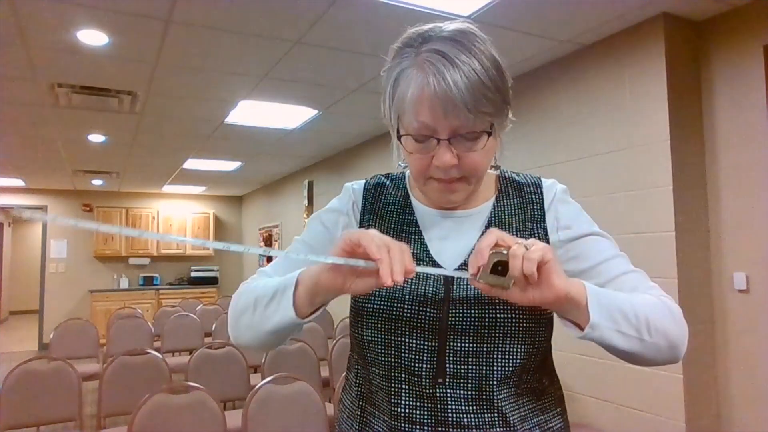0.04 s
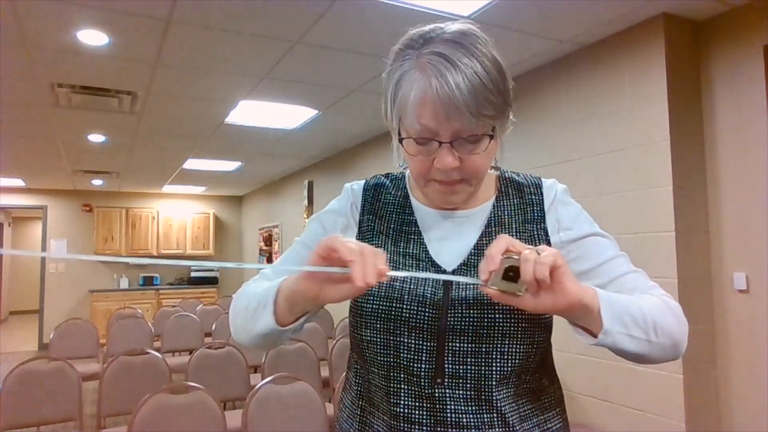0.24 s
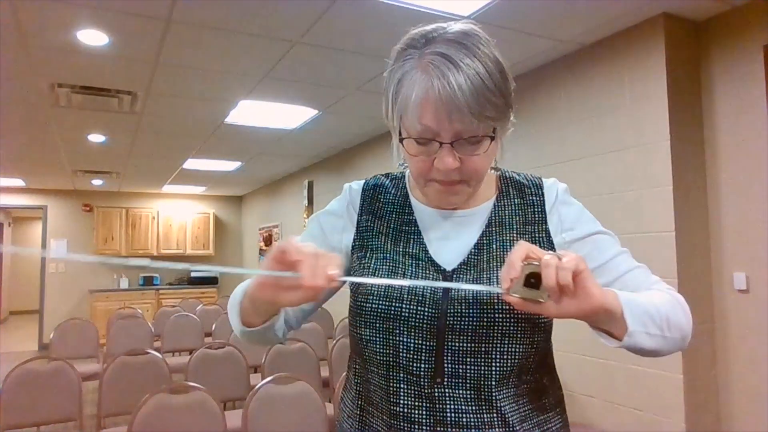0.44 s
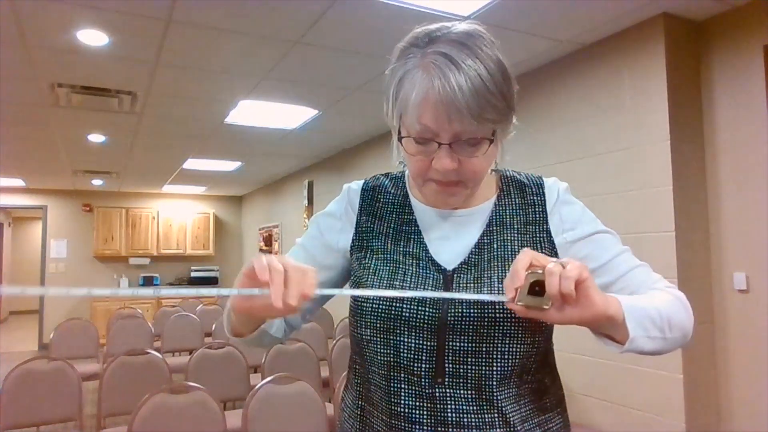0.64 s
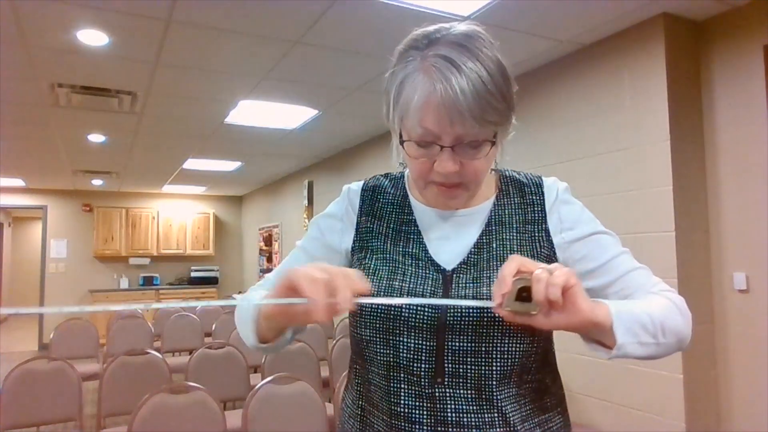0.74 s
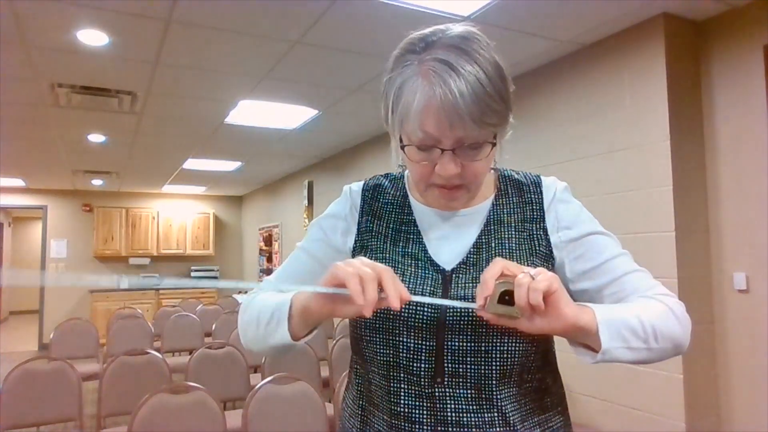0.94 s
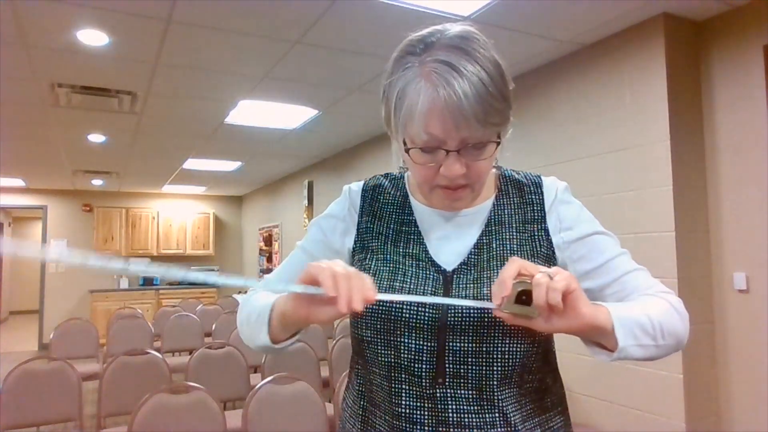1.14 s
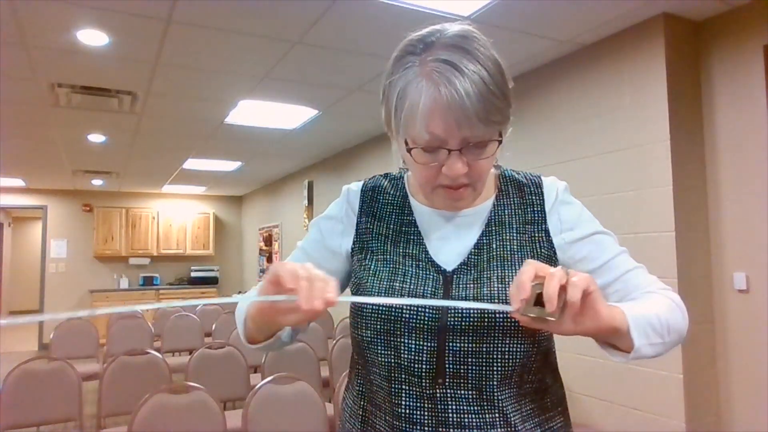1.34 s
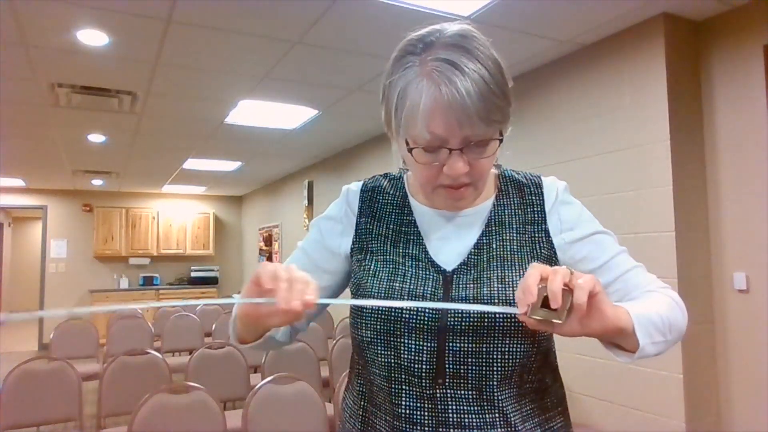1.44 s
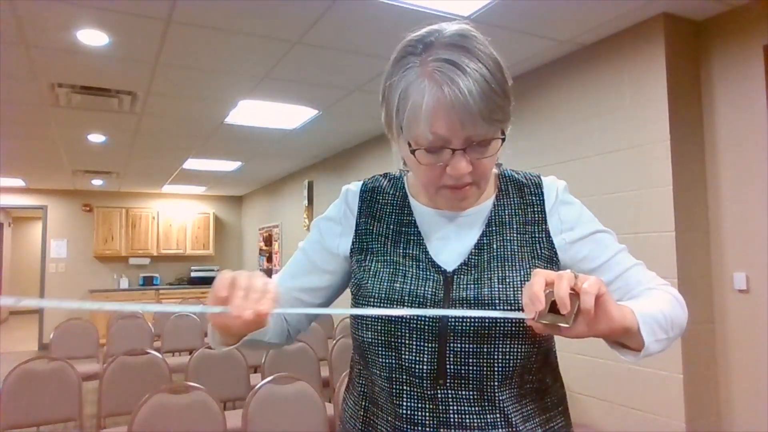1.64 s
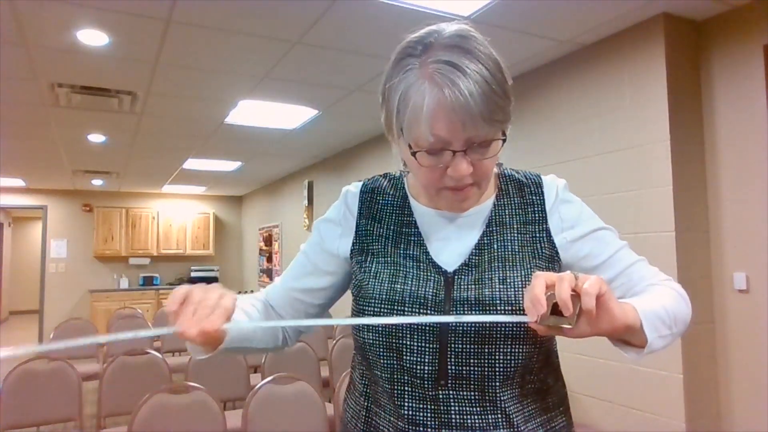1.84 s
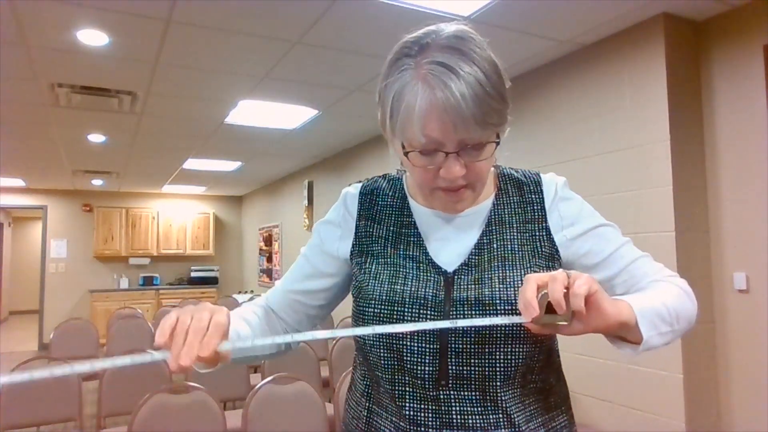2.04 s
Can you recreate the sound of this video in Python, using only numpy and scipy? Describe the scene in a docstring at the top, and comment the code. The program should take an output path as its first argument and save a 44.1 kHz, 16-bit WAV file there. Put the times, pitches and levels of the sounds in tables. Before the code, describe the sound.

Metal tape measure blade rasps out of its case, clatters to a stop, then is drawn again

```python
"""A large, well damped room: a steel tape measure is drawn from its case in two pulls, close by.
Slips of the curved blade in the slot make coloured noise; catches and the clattering stop ring resonances.
Between the pulls a hand slides back along the blade, heard as fluttering high noise.
Underneath are a low electrical throb of filtered pulses, thin wavering sines and a little hiss."""
import sys
import numpy as np
from scipy import signal
from scipy.fft import rfft, irfft, next_fast_len
from scipy.io import wavfile

SR = 44100
rng = np.random.default_rng(int(sys.argv[2]) if len(sys.argv) > 2 else 0)


def int16_out(signal):
    """Quantize to a 16-bit WAV file."""
    q = np.round(np.clip(np.atleast_2d(signal).T, -1, 1) * 32767)
    wavfile.write(sys.argv[1], SR, q.astype(np.int16))


N = 91595
TIME_S = np.arange(N) / SR
TREBLE_CORNER_HZ = 7900

# blade and case colour at take-up and regrip: (frequency [Hz], relative level [dB])
TAKE_UP_COLOUR = [(350, -54.5), (600, -17), (747, -18.5), (1080, -15.5), (1380, -36.5), (1820, -16.5),
                  (2270, -14), (2600, -1), (2940, -4), (3420, 5), (4200, -6), (4750, 0), (5920, -5.5),
                  (6600, -2.5), (7270, -8), (7780, -11.5), (10800, -11.5), (12100, -10), (15900, -11)]


def from_db(db):
    """Decibels to amplitude gain."""
    return 10 ** (np.asarray(db) / 20)


def rms_one(x):
    """Scale to unit power."""
    return x / np.sqrt(np.mean(x ** 2) + 1e-20)


def drift(rate_hz):
    """Random wander of unit rms: noise through a double one-pole low-pass."""
    pole = np.exp(-2 * np.pi * rate_hz / SR)
    noise = rng.standard_normal(N + SR)
    settled = signal.lfilter([1], [1, -2 * pole, pole * pole], noise)[SR:]
    return rms_one(settled)


def envelope(curve, edge_s=0.003):
    """Gain along a (time [s], level [dB]) curve, with Gaussian fades beyond its ends."""
    time_s, level_db = np.transpose(curve)
    outside_s = np.maximum(np.maximum(time_s[0] - TIME_S, TIME_S - time_s[-1]), 0)
    return from_db(np.interp(TIME_S, time_s, level_db)) * np.exp(-(outside_s / edge_s) ** 2)


def coloured(x, spectrum, size=4096):
    """Minimum-phase filter along a (frequency [Hz], level [dB]) spectrum; unit power."""
    hz, db = np.transpose(spectrum)
    grid_hz = np.maximum(np.arange(size // 2 + 1) * SR / size, 1)
    low_rolloff = np.minimum(grid_hz / hz[0], 1) ** 2
    magnitude = low_rolloff * from_db(np.interp(np.log(grid_hz), np.log(hz), db))
    # fold the cepstrum onto positive time to make the filter causal
    cepstrum = irfft(np.log(magnitude))
    cepstrum[1:size // 2] *= 2
    cepstrum[size // 2 + 1:] = 0
    response = irfft(np.exp(rfft(cepstrum)))
    return rms_one(signal.fftconvolve(x, response)[:N])


def resonate(x, modes):
    """Parallel resonances (frequency [Hz], width [Hz], level [dB]) with alternating signs."""
    out = 0
    for k, (hz, width_hz, db) in enumerate(modes):
        r = np.exp(-np.pi * width_hz / SR)
        gain = (-1) ** k * from_db(db) * (1 - r * r) / 2
        poles = [1, -2 * r * np.cos(2 * np.pi * hz / SR), r * r]
        out = out + gain * signal.lfilter([1, 0, -1], poles, x + 1e-18)
    return out


def rubbed(force, modes):
    """Resonances driven by a rough contact; a steady force of 1 gives unit power."""
    noise = rng.choice([-1., 1.], N)
    return resonate(noise * force, modes) / np.std(resonate(noise, modes))


def burst(start_s, length_s):
    """Contact force that sets in at once and dies away as a half Gaussian."""
    return (TIME_S >= start_s) * np.exp(-((TIME_S - start_s) / length_s) ** 2)


def tail(x, t60_s):
    """Dense ring: convolution with exponentially decaying noise of unit energy."""
    response = rng.standard_normal(N) * from_db(-60 * TIME_S / t60_s)
    return signal.fftconvolve(x, response / np.sqrt(np.sum(response ** 2)))[:N]


def rough_noise(rough_db, rate_hz):
    """Noise whose strength flutters."""
    return rng.standard_normal(N) * from_db(rough_db * drift(rate_hz))


def high_pass(x):
    """First-order treble split."""
    return signal.sosfilt(signal.butter(1, TREBLE_CORNER_HZ, "high", fs=SR, output="sos"), x)


def scrape(curve, colour):
    """Tiny slips under fluttering contact pressure ring the blade; harder scraping is brighter."""
    slips_per_s, slip_spread_db = 7000, 2.5
    chatter_hz, chatter_db = 78, 1
    steel_t60_s, steel_db = 0.11, -7
    brightening = 0.23  # extra treble dB per dB of scraping

    size_db = slip_spread_db * np.minimum(rng.exponential(1, N), 4)
    sizes = from_db(size_db) * rng.choice([-1, 1], N)
    happens = rng.random(N) < slips_per_s / SR
    slips = sizes * happens * from_db(chatter_db * drift(chatter_hz))
    sound = coloured(slips + from_db(steel_db) * tail(slips, steel_t60_s), colour)

    gain = envelope(curve)
    effort = gain / np.sqrt(np.sum(gain ** 4) / np.sum(gain ** 2))
    treble_gain = (effort + 1e-9) ** brightening
    return gain * (sound + high_pass(sound) * (treble_gain - 1))


def blade():
    """First pull and clattering stop, then take-up and long pull; colour varies with grip and free length."""
    # scraping in each phase, before its trim: (time [s], level [dB])
    first_curve = [(0.03, -72), (0.082, -60), (0.11, -60.5), (0.124, -50.5), (0.172, -46), (0.198, -46),
                   (0.252, -44), (0.32, -37.5), (0.384, -37.5), (0.39, -38), (0.424, -43.5), (0.518, -40.5),
                   (0.53, -45)]
    clatter_curve = [(.522, -41), (.531, -34), (.535, -30), (.55, -28), (.561, -29.5), (.569, -31),
                     (.576, -31), (.586, -25.5), (.591, -33), (.603, -32.5), (.615, -45), (.627, -44),
                     (.64, -58), (.65, -54)]
    take_up_curve = [(1.03, -69), (1.065, -57), (1.085, -47), (1.105, -46.5), (1.12, -49), (1.125, -38),
                     (1.16, -38), (1.182, -45), (1.207, -42.5), (1.225, -46), (1.258, -46.5), (1.29, -39),
                     (1.305, -45)]
    long_curve = [(1.30, -45), (1.311, -31.5), (1.324, -32.5), (1.345, -31.5), (1.37, -33.5), (1.402, -33),
                  (1.412, -37), (1.45, -37), (1.47, -36), (1.52, -38.5), (1.58, -36), (1.63, -42),
                  (1.70, -39), (1.755, -48), (1.80, -42), (1.825, -36), (1.86, -35), (1.886, -38.5),
                  (1.91, -53), (1.94, -74)]
    # blade and case colour: (frequency [Hz], relative level [dB])
    first_colour = [(590, -62), (1000, -24), (1180, -23), (1350, -28.5), (1590, -17), (1960, -11.5),
                    (2120, -8.5), (2930, -3), (3220, -2), (3490, -4), (3830, -10.5), (4660, 2),
                    (6080, -11.5), (7140, -5.5), (8210, -14.5), (9880, -17), (11100, -12), (12600, -14.5),
                    (13800, -8.5), (15300, -20.5), (15900, -20.5)]
    clatter_colour = [(350, -92.5), (600, -27), (857, -24.5), (996, -20), (1370, -26), (1480, -28),
                      (2270, -13.5), (2500, -6), (2900, -8), (3370, -0.5), (3870, -14.5), (4620, -4),
                      (5380, -5.5), (6600, -1), (7270, -8.5), (9300, -5.5), (10800, -14.5), (11900, -7.5),
                      (15900, -18.5)]
    tug_colour = [(350, -76), (600, -35), (717, -18.5), (857, -25.5), (943, -39.5), (1020, -20.5),
                  (1520, -21.5), (1610, -25.5), (2390, -10), (2640, -7), (3420, 2.5), (5840, -10.5),
                  (6790, -0.5), (7680, -23), (9560, -3), (10500, -17), (11900, -14.5), (14800, -9),
                  (15900, -13)]
    glide_colour = [(350, -66), (600, -36), (857, -35), (1080, -10.5), (1400, -27), (1590, -11.5),
                    (2000, -22), (2600, 4.5), (2940, -2), (3370, -1), (3660, -5), (4200, 4.5), (4880, -15),
                    (5300, -3.5), (6080, -9), (6790, 1.5), (7680, -11.5), (8450, -13), (9430, -23),
                    (13600, -9.5), (15900, -17.5)]
    first_trim_db, clatter_trim_db, take_up_trim_db, long_trim_db = -1.0, -2.54, -0.96, -1.86
    tug_eases_s, easing_s = 1.414, 0.11  # centre and length of the crossfade

    # the hard tug gives way to an even glide
    eased = np.clip((TIME_S - tug_eases_s) / easing_s + 0.5, 0, 1)
    tug = np.sqrt(1 - eased) * scrape(long_curve, tug_colour)
    glide = np.sqrt(eased) * scrape(long_curve, glide_colour)

    first_pull = from_db(first_trim_db) * scrape(first_curve, first_colour)
    clatter = from_db(clatter_trim_db) * scrape(clatter_curve, clatter_colour)
    take_up = from_db(take_up_trim_db) * scrape(take_up_curve, TAKE_UP_COLOUR)
    return first_pull + clatter + take_up + from_db(long_trim_db) * (tug + glide)


def flexing(x, count=34):
    """As the blade flexes, narrow bands evenly spaced in root frequency swell and fade independently."""
    swell_db, swell_hz = 2.5, 19.5
    size = next_fast_len(N + 2048)
    spectrum = rfft(x, size)
    hz = np.arange(size // 2 + 1) * SR / size
    place = np.interp(np.sqrt(hz), np.sqrt([600, 16000]), [0, count - 1])
    out = 0
    for k in range(count):
        weight = np.maximum(1 - abs(place - k), 0)
        band = irfft(spectrum * weight, size)[:N]
        out = out + band * from_db(swell_db * drift(swell_hz))
    return out


def treble_shelf(x):
    """Raise or lower the treble of the scraping along a curve."""
    # treble gain: (time [s], level [dB])
    treble_curve = [(.08, -17), (.16, -1.5), (.24, -1.5), (.32, 3.5), (.42, 7), (.52, 8.5), (.6, -1),
                    (1.12, -4.5), (1.25, 8), (1.38, -0.5), (1.46, -3), (1.56, 2), (1.70, -2.5), (1.80, 5),
                    (1.89, -0.5)]
    gain = from_db(np.interp(TIME_S, *np.transpose(treble_curve)))
    return x + high_pass(x) * (gain - 1)


def brief_dips():
    """Gain that dips where the level briefly thins out."""
    # dips: (centre [s], half length [s], level [dB])
    dips = [(0.161, 0.015, -6.5), (0.393, 0.011, -4.5), (1.415, 0.0064, -3.5), (1.477, .013, -3),
            (1.592, 0.0078, -1), (1.717, 0.01, -5)]
    return from_db(sum(db * np.exp(-((TIME_S - s) / half_s) ** 4) for s, half_s, db in dips))


def rasp(rough_db=3.0, slips_hz=120):
    """On the long pull the blade's edge sticks and slips in the slot: one resonance under fluttering force."""
    # rasp force: (time [s], level [dB])
    rasp_curve = [(1.30, -59), (1.35, -40), (1.39, -43.5), (1.44, -54), (1.52, -49), (1.62, -51.5),
                  (1.72, -50), (1.78, -42), (1.83, -41), (1.885, -41.5), (1.905, -62)]
    force = envelope(rasp_curve) * from_db(rough_db * drift(slips_hz))
    return rubbed(force, [(6836, 154, 0)])  # (frequency [Hz], width [Hz], level [dB])


def catches():
    """The blade catches on the slot: short harsh contacts, each driving low, middle and high rings."""
    # contacts: (start [s], length [s], low ring [dB], middle ring [dB], high ring [dB])
    contacts = [(0.079, 0.015, -64, -66, -79), (.1235, 0.016, -53, -66, -64),
                (0.195, 0.0017, -40, -50, -63), (.2915, 0.002, -31, -38, -42),
                (0.319, 0.0025, -30, -35, -44), (0.386, 0.025, -40, -53, -36.5),
                (0.501, .003, -35, -42, -42), (0.534, 0.0056, -40, -34, -21), (.540, 0.0048, -41, -28, -25),
                (0.556, 0.0014, -34, -40, -28), (0.576, 0.0057, -39, -32, -26.5),
                (.584, 0.0028, -37, -27, -52), (0.622, 0.0032, -40, -45, -64),
                (0.657, 0.014, -54, -70, -76), (0.706, 0.0019, -55.5, -64.5, -59),
                (0.749, 0.0025, -57, -58.5, -62), (1.0815, 0.00087, -52, -58, -56),
                (1.1185, 0.01, -41, -46, -50), (1.188, .002, -40.5, -61, -46),
                (1.1926, 0.0015, -39, -28.5, -25), (1.1975, 0.00072, -52.5, -50, -40),
                (1.3199, 0.004, -41, -19, -30), (1.325, 0.0021, -38.5, -30, -40.5),
                (1.342, .003, -40, -42, -28), (1.8262, 0.0015, -33, -30, -53),
                (1.8322, 0.0014, -45.5, -29, -55), (1.855, .002, -56, -42, -53.5),
                (1.882, 0.0013, -51, -49, -42.5)]
    # ring modes: (frequency [Hz], width [Hz], relative level [dB])
    low_ring = [(2895, 210, 6), (3390, 224, 0), (4970, 190, 4.5)]
    middle_ring = [(6150, 450, 0), (6816, 320, 9.5)]
    high_ring = [(8670, 120, 4.5), (9130, 160, 3), (11800, 480, 4.5), (13800, 3700, -7), (16300, 240, 3.5)]
    out = 0
    for k, modes in enumerate((low_ring, middle_ring, high_ring)):
        force = sum(from_db(row[2 + k]) * burst(row[0], row[1]) for row in contacts)
        out = out + rubbed(force, modes)
    return out


def blade_ringing(steel, ring_db=-9.5):
    """Thin ringing of the blade: narrow resonances driven by the scraping, rasp and catches."""
    # blade modes: (frequency [Hz], width [Hz], relative level [dB])
    blade_modes = [(2670, 28.7, -7), (3430, 42, 8.5), (3473, 29, 6.5), (3889, 4.8, -19.5), (4400, 22, -29),
                   (5940, 13, 12), (6200, 11, -25.5), (6520, 28, -2), (7800, 13.8, -5), (8940, 16.2, -7),
                   (9400, 16, -10), (10800, 36, -0.5), (11906, 20, 9), (13409, 14.5, -8.5)]
    # one mode at a time, so that all signs are alike
    return from_db(ring_db) * sum(resonate(steel, [mode]) for mode in blade_modes)


def bends():
    """Rough bending tones, noise-modulated sines, that sink as the free blade lengthens."""
    # tones: (start [s], length [s], start frequency [Hz], level [dB])
    bend_tones = [(.185, 0.08, 2506, -50), (.21, 0.049, 2770, -48.5), (0.313, .08, 2280, -57),
                  (0.37, .10, 2464, -58.5)]
    sink_octaves_per_s, rough_hz = 4.5, 180
    out = 0
    for start_s, length_s, start_hz, db in bend_tones:
        age_s = np.clip(TIME_S - start_s, 0, length_s)
        phase = 2 * np.pi * np.cumsum(start_hz * 2 ** (-sink_octaves_per_s * age_s)) / SR
        tone = drift(rough_hz) * np.sin(phase) + drift(rough_hz) * np.cos(phase)
        swell = np.sqrt(np.abs(np.sin(np.pi * age_s / length_s)))
        out = out + from_db(db) * swell * tone
    return out


def reel(rough_db=5.0, bumps_hz=35):
    """The turning reel rubs unevenly inside the case and rings its broad resonances."""
    # rubbing force before the brief dips: (time [s], level [dB])
    reel_curve = [(.05, -79), (.2, -65.5), (.33, -62.5), (.44, -68.5), (.58, -67), (.68, -66), (.8, -76),
                  (.95, -86), (1.08, -68.5), (1.36, -72.5), (1.6, -67.5), (1.87, -70), (1.94, -80)]
    # reel modes: (frequency [Hz], width [Hz], relative level [dB])
    reel_modes = [(373.5, 77, 6), (717, 200, 3), (1158, 660, 6.5), (1515, 710, 3)]
    return rubbed(envelope(reel_curve) * from_db(rough_db * drift(bumps_hz)), reel_modes)


def case_knock():
    """The case is jolted in the hand: a short rough contact rings its modes."""
    # case modes: (frequency [Hz], width [Hz], relative level [dB])
    case_modes = [(540, 270, -10), (740, 100, 1), (987, 153, -4.5)]
    start_s, length_s, level_db = 0.5415, 0.009, -42.5
    return rubbed(from_db(level_db) * burst(start_s, length_s), case_modes)


def grip_creak():
    """A small creak of the grip: a short rough contact on one resonance."""
    start_s, length_s, level_db = 2.034, 0.009, -56.5
    return rubbed(from_db(level_db) * burst(start_s, length_s), [(1823, 200, 0)])  # Hz, width Hz, dB


def hand_on_blade():
    """Fingers slide back along the blade, a fluttering high noise, then close on it with a light scrape."""
    # (time [s], level [dB])
    slide_curve = [(.66, -79), (.70, -57), (.78, -57.5), (.86, -56), (.93, -58.5), (.98, -52), (1.0, -57),
                   (1.02, -68)]
    grip_curve = [(.935, -83.5), (.95, -60), (.98, -59), (1.005, -65), (1.02, -69.5)]
    # (frequency [Hz], relative level [dB])
    slide_colour = [(5000, -39), (8000, -30), (9500, -22), (10200, -6), (10600, -13), (11500, -2),
                    (13300, 0), (14800, 2), (15700, -13)]
    slide = envelope(slide_curve) * coloured(rough_noise(rough_db=1.5, rate_hz=100), slide_colour)
    return slide + scrape(grip_curve, TAKE_UP_COLOUR)


def room_tail(x):
    """Faint dull room: a dense decay behind a low-pass."""
    t60_s, level_db, dull_hz = 0.5, -23, 3500
    dull = signal.butter(2, dull_hz, fs=SR, output="sos")
    return from_db(level_db) * signal.sosfilt(dull, tail(x, t60_s))


def electrical_throb():
    """Soft low pulses, thirty a second, ring resonances over a noise drone; both swell and sink together."""
    # throb modes: (frequency [Hz], width [Hz], relative level [dB])
    throb_modes = [(103.4, 33.6, 34), (170, 37, -27), (318, 37, -26.5)]
    # drone modes: (frequency [Hz], width [Hz], relative level [dB])
    drone_modes = [(89.2, 15, 0.5), (120.2, 12, 1.5)]
    # common level: (time [s], level [dB])
    throb_curve = [(0, -54.5), (.12, -61.5), (.21, -53), (.30, -53), (.40, -57), (.52, -52.5), (.62, -58),
                   (.76, -56.5), (.85, -54.5), (.92, -53.5), (1.0, -59.5), (1.12, -55.5), (1.23, -51.5),
                   (1.36, -56), (1.51, -54.5), (1.64, -57.5), (1.80, -57.5), (1.95, -56), (2.08, -54.5)]
    rate_hz, first_pulse_s, spread_db = 29.98, 0.0238, 2.2
    drone_db = -5.5  # force, relative to the throb
    band = signal.butter(2, [53, 343], "band", fs=SR, output="sos")  # Hz

    at = (np.arange(first_pulse_s, N / SR, 1 / rate_hz) * SR).astype(int)
    pulses = np.zeros(N)
    pulses[at] = -from_db(spread_db * rng.standard_normal(len(at)))
    throb = signal.sosfilt(band, resonate(pulses, throb_modes))
    drone = signal.sosfilt(band, rubbed(from_db(drone_db), drone_modes))
    return envelope(throb_curve) * (rms_one(throb) + drone)


def whine():
    """Thin sines whose frequencies wander slightly."""
    # tones: (mean frequency [Hz], rms level [dB])
    whine_tones = [(2848, -74), (5120, -82), (5728, -79.5), (8000, -84)]
    wander_rms_hz, wander_rate_hz = 7.7, 40
    out = 0
    for hz, db in whine_tones:
        phase = 2 * np.pi * np.cumsum(hz + wander_rms_hz * drift(wander_rate_hz)) / SR
        out = out + from_db(db) * np.sqrt(2) * np.sin(phase)
    return out


def hiss(level_db=-62.5):
    """Steady coloured noise."""
    # (frequency [Hz], relative level [dB])
    hiss_colour = [(40, -10), (70, 13.5), (150, 5.5), (400, -6.5), (700, -11), (1400, -12.5), (2500, -13),
                   (5000, -19.5), (8000, -29), (15000, -19)]
    return from_db(level_db) * coloured(rng.standard_normal(N), hiss_colour)


def scene():
    """The tape measure and hands with a faint dull room tail, over throb, whine and hiss."""
    thinning = brief_dips()
    steel = thinning * treble_shelf(flexing(blade())) + rasp() + catches()
    hands = case_knock() + grip_creak() + hand_on_blade()
    # the reel dips by twice as many dB as the scraping
    tape = steel + blade_ringing(steel) + bends() + thinning ** 2 * reel() + hands
    background = electrical_throb() + whine() + hiss()
    return (tape + room_tail(tape) + background)[None]


def record(dry):
    """Steep elliptic low-pass: 0.1 dB ripple, 80 dB stop band."""
    cutoff_hz = 15720
    return signal.sosfilt(signal.ellip(12, 0.1, 80, cutoff_hz, fs=SR, output="sos"), dry)


dry = scene()
out = record(dry)
int16_out(out)
```